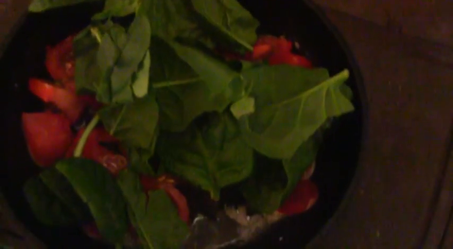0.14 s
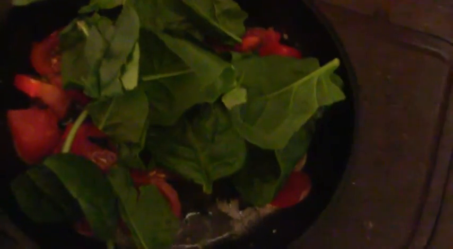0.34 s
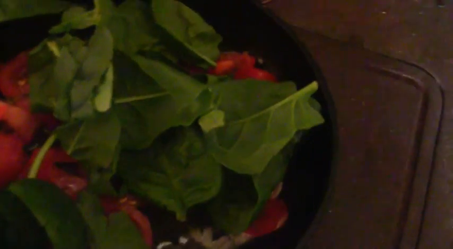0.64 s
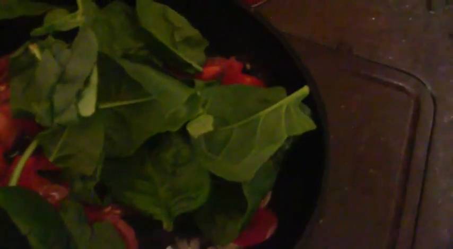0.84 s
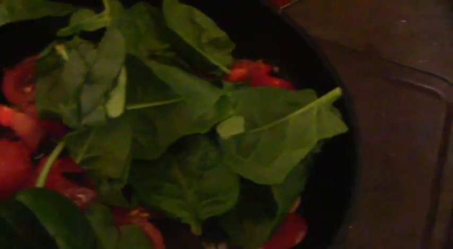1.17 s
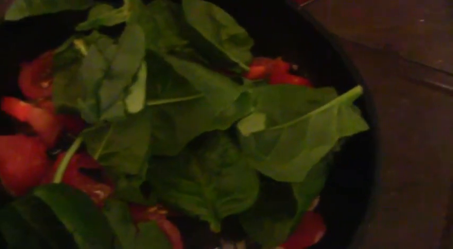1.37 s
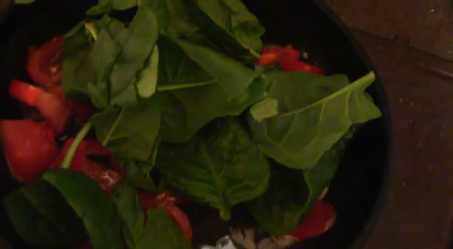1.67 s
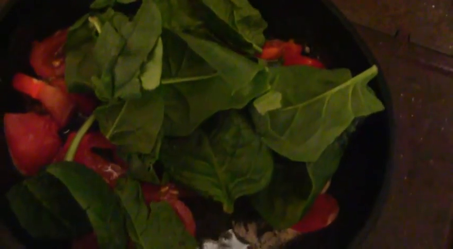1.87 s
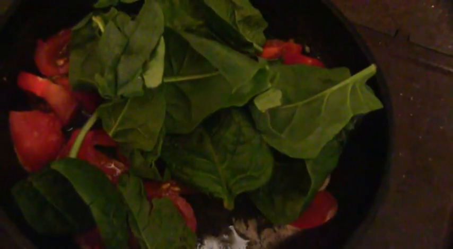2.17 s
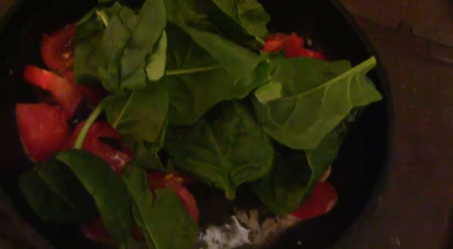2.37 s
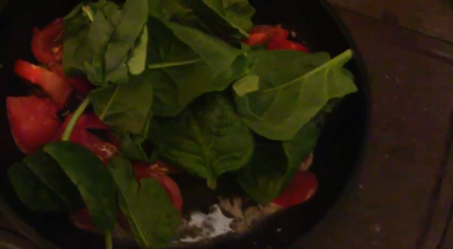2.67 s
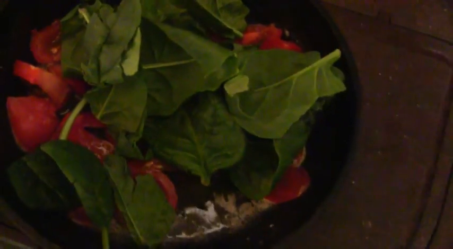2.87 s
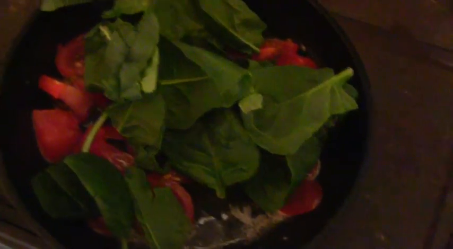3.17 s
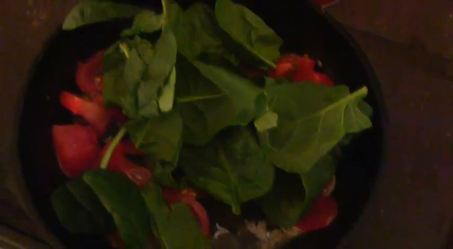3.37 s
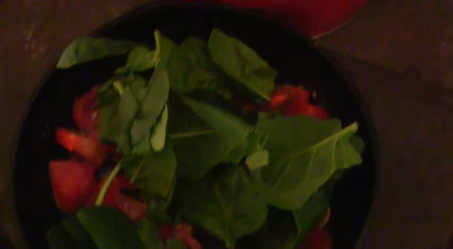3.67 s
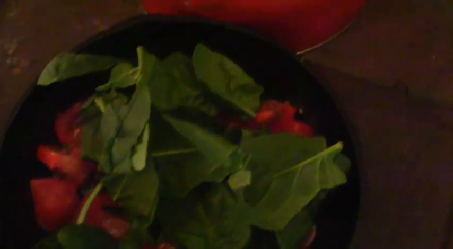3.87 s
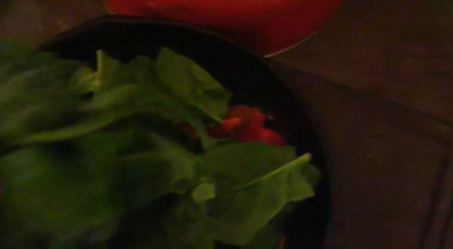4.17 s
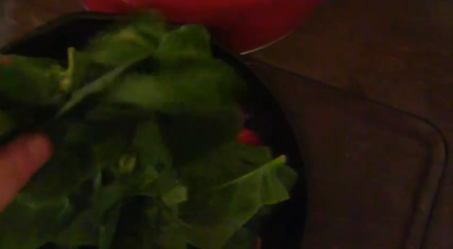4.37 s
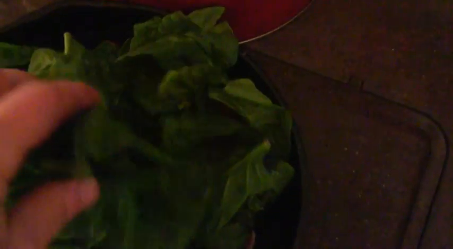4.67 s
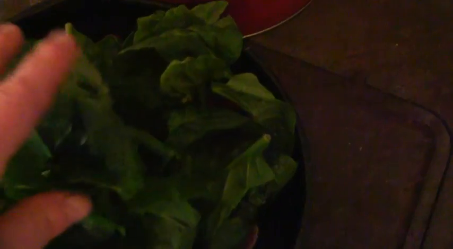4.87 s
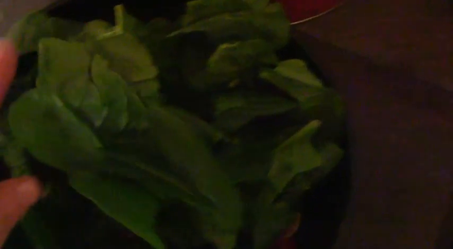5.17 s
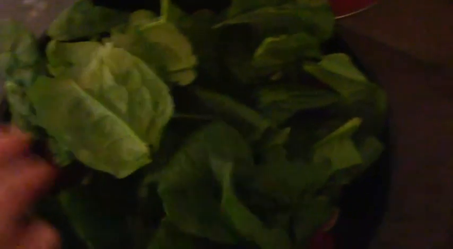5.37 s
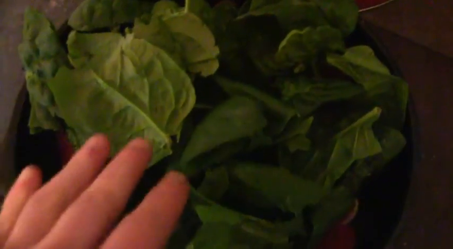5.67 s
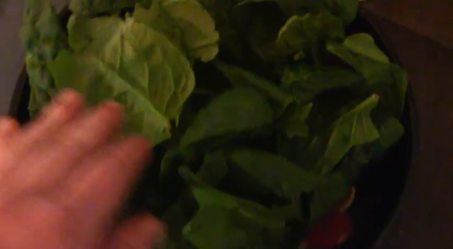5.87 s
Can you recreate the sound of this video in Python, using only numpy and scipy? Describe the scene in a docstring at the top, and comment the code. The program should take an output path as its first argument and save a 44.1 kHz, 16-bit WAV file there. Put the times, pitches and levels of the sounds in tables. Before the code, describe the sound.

Near a close stereo microphone, leafy greens are grabbed and crunch loudly for a few seconds, with dull pats of broad leaves and a sharp click near the middle of the bustle. The noise thins out, small hollow bumps ring a bowl, and soft rustles and tiny ticks mark the pile settling in the pan. Short room reverberation and faint appliance hum surround it.

```python
"""Raw spinach leaves rustle and crinkle close by as a handful is gathered, then more softly as it is piled into a pan:
noise and tiny snaps follow the hand's strokes, with coloured bursts for the largest buckles.
Stems flick free as rough notes, leaves pat the bowl and scrape its rim, something hard clicks once and rebounds,
and hollow knocks ring the bowl's modes. A small kitchen answers with a diffuse tail, over still air and a low hum."""
import sys
import numpy as np
from scipy import signal
from scipy.fft import rfft, irfft, next_fast_len
from scipy.io import wavfile
from scipy.ndimage import uniform_filter1d, map_coordinates

SR = 44100
rng = np.random.default_rng(int(sys.argv[2]) if len(sys.argv) > 2 else 0)


def put_to_file(sound):
    """Save the sound as 16-bit audio at rate SR, in the file named by the first command-line argument."""
    columns = np.atleast_2d(sound).T  # one column per channel
    safe = np.clip(columns, -1, 1)
    whole_steps = np.round(safe * 32767)
    wavfile.write(sys.argv[1], SR, whole_steps.astype(np.int16))


N = 265437


def amp(db):
    """Decibels to amplitude gain."""
    return 10 ** (np.asarray(db) / 20)


def unit(x):
    """Scale to rms 1."""
    return x / np.sqrt(np.mean(x ** 2) + 1e-20)


def along(points, hz):
    """Interpolate (frequency [Hz], value) points on a log-frequency axis."""
    point_hz, values = np.transpose(points)
    return np.interp(np.log(hz + 1), np.log(point_hz + 1), values)


def wobble(rate_hz):
    """Smooth random curve with rate_hz knots a second."""
    knots = rng.standard_normal(int(N * rate_hz / SR) + 4)
    return map_coordinates(knots, [np.arange(N) * rate_hz / SR])


def coloured(x, gain_db):
    """Causal minimum-phase filter from a gain [dB] function of frequency [Hz]."""
    n = x.shape[-1]
    m = 2 * next_fast_len(n)
    gain = np.maximum(amp(gain_db(np.fft.rfftfreq(m, 1 / SR))), 1e-6)
    cepstrum = irfft(np.log(gain))
    # fold the cepstrum onto positive time
    cepstrum[1:m // 2] *= 2
    cepstrum[m // 2 + 1:] = 0
    return irfft(rfft(x, m) * np.exp(rfft(cepstrum)), m)[..., :n]


# stereo width: (frequency [Hz], side gain [dB])
SIDE_WIDTH = [(100, -9.5), (500, -8), (2000, -6), (12000, -6)]


def stereo(mid, side):
    """Mid and side to left and right: nearly alike in the bass, wider in the treble."""
    side = coloured(side, lambda hz: along(SIDE_WIDTH, hz))
    return np.array([mid + side, mid - side])


def add(track, time_s, sound):
    """Mix a sound in at time_s, cut at the track's end."""
    part = track[..., round(time_s * SR):][..., :sound.shape[-1]]
    part += sound[..., :part.shape[-1]]


def ring(hz, t60_s, attack_s):
    """One damped mode: an exponentially decaying sine with a soft attack."""
    t = np.arange(SR // 4) / SR
    return np.sin(2 * np.pi * hz * t) * amp(-60 * t / t60_s) * (1 - np.exp(-t / attack_s))


def rough_phase(hz, t, blur):
    """Mid and side phase of a tone whose pitch is blurred by a random walk."""
    walk = np.cumsum(rng.standard_normal((2, len(t))), axis=1)
    return 2 * np.pi * hz * t + blur * np.sqrt(hz / SR) * walk


# still air spectrum: (frequency [Hz], relative level [dB per Hz])
AIR_SPECTRUM = [(20, -38), (40, -17), (60, -10.5), (95, -8), (200, -4.5), (280, -7), (370, -13.5),
                (520, -12.5), (1500, -23), (4000, -29), (10000, -33.5), (16000, -40.5)]
# appliance hum tones: (frequency [Hz], central rms level [dB])
HUM_TONES = [(76, -62), (120, -64)]


def background(air_db=-52.0, waver_db=3, drift_rad=1.83):
    """Still kitchen air as shaped noise; appliance hum as sines wavering in level and phase."""
    t = np.arange(N) / SR
    air = unit(coloured(rng.standard_normal((2, N)), lambda hz: along(AIR_SPECTRUM, hz)))
    hum = np.zeros(N)
    for hz, db in HUM_TONES:
        level = amp(db + waver_db * wobble(8))
        hum += level * np.sin(2 * np.pi * hz * t + drift_rad * wobble(9))
    return amp(air_db) * stereo(*air) + np.sqrt(2) * hum


# loudest leaves and stems buckling:
# (time [s], relative level [dB], treble share [dB], fold resonance [Hz])
BUCKLES = [(0.3035, -33, -16, 2740), (0.4425, -32.5, -22, 2540), (0.4867, -27, -15, 3130),
           (0.608, -31.5, -11, 1340), (0.699, -21, -9, 1390), (0.7257, -20.5, -8, 7640),
           (0.767, -28.5, -2, 6860), (0.8305, -21, -9, 8500), (0.877, -23, -2, 3870),
           (0.902, -16.5, -6, 5170), (0.9104, -15, -7, 4440), (0.921, -19.5, -10, 2770),
           (0.9708, -17.5, -21, 2200), (0.9803, -21, -8, 1400), (1.0076, -19, 0, 6470),
           (1.0358, -20, 2, 4650), (1.075, -23, -8, 3400), (1.1324, -17, -10.5, 8450),
           (1.2323, -18, -8, 3460), (1.2466, -18, -11, 7000), (1.263, -23, 8, 7140),
           (1.2992, -17, -14, 7600), (1.352, -21, -9, 1850), (1.368, -22, -8, 2980),
           (1.404, -19.5, -10, 2530), (1.4227, -16.5, 2, 4580), (1.453, -23, -10, 2260),
           (1.49, -20, -6, 3030), (1.516, -19.5, -16, 3430), (1.5868, -15, -11.5, 2740),
           (1.608, -20.5, -3, 7000), (1.622, -20, -4, 2730), (1.677, -25, -14, 1350),
           (1.9792, -25, -15, 3160), (2.122, -25, -13, 3180), (2.223, -22, -18, 1290),
           (2.322, -26.5, -5, 4410), (2.359, -20, -23, 1780), (2.4851, -15.5, -12, 3500),
           (2.492, -17.5, -11, 3000), (2.572, -25, -11, 3830), (2.598, -15, -11.5, 2970),
           (2.641, -24, 4, 5000), (2.6803, -14.5, -12, 2900), (2.7047, -19.5, -5, 2920),
           (2.722, -19.5, -7, 3200), (2.8013, -21, -10, 4800), (2.8765, -33, 0, 4900),
           (2.8963, -30, -8, 3700), (2.9592, -25.5, -19, 1540), (2.9916, -28, -6, 4700),
           (3.0233, -33, 1, 3670), (3.0915, -23, -10, 2430), (3.1853, -27, -13, 3600),
           (3.268, -25.5, -1, 4000), (3.28, -24.5, -15, 7970), (3.4251, -23.5, -5, 1660),
           (3.477, -20.5, -1, 7550), (3.563, -29, -6, 1640), (4.1218, -29, -18, 1170),
           (4.485, -29.5, -20, 2700), (4.6455, -28.5, -14, 3760)]
# near-leaf spectrum: (frequency [Hz], relative level [dB])
NEAR_LEAF_SPECTRUM = [(40, -54), (350, -7), (600, 0), (1100, 1), (1600, -0.5), (2300, -2), (3100, -1.5),
                      (5000, -3.5), (8000, -6), (11000, -10.5), (14500, -11), (16000, -23)]
BUCKLE_BUILD_DB_PER_S, BUCKLE_PEAK_S, BUCKLE_T60_S = 7000, 0.0011, .062
FOLD_DB, RAGGED_DB = 8.5, 3.2  # fold resonance boost; scale of the random level


def crinkles(level_db=-12, hold_s=0.0017, colour=0.46, octaves=0.13, low_db=-2, dull_body=0.18,
             usual_treble_db=-12, top_colour=0.9, top_db=-2):
    """A buckling leaf's ragged fractures build, hold and die; the fold colours them, dull ones have more body."""
    lead = SR // 100
    out, t = np.zeros((2, N + lead)), np.arange(-lead, SR // 8) / SR
    age = t - BUCKLE_PEAK_S
    build_db = BUCKLE_BUILD_DB_PER_S * np.minimum(age, 0)
    shape = amp(build_db - 60 * np.maximum(age - hold_s, 0) / BUCKLE_T60_S)
    for time_s, db, treble_db, fold_hz in BUCKLES:
        knots = rng.standard_normal(len(t))
        ragged = amp(RAGGED_DB * map_coordinates(knots, [(t - t[0]) * 900], order=1))
        bright_db = treble_db - usual_treble_db
        tilt = [(1800, low_db - dull_body * bright_db), (4000, 0.039),
                (8000, colour * bright_db), (13000, top_colour * bright_db + top_db)]

        def spectrum_db(hz):
            fold_db = FOLD_DB / (1 + (np.log2((hz + 1) / fold_hz) / octaves) ** 2)
            return along(NEAR_LEAF_SPECTRUM, hz) + along(tilt, hz) + fold_db

        burst = coloured(rng.standard_normal((2, len(t))) * ragged * shape, spectrum_db)
        early_rms = np.sqrt(np.mean(burst[:, lead:lead + SR // 125] ** 2))  # first 8 ms
        add(out, time_s, amp(db + level_db) * burst / early_rms)
    return stereo(*out[:, lead:])


# hand strokes through the leaves:
# (start [s], length [s], crisp rustle level [dB], soft flapping relative to it [dB])
HAND_STROKES = [(0.382, 0.14, -43, -3.5), (0.568, 0.54, -42, -3), (0.822, 0.16, -36, -17),
                (1.151, 0.63, -36.5, -7), (1.72, 0.22, -40, -7.5), (1.937, 0.32, -43.5, -6.5),
                (2.185, 0.04, -33, -14), (2.284, 0.38, -39, -8), (2.6, 0.18, -36, -7),
                (2.923, 0.23, -47.5, -5), (3.407, 0.039, -40.5, -4), (3.716, 0.5, -56, -8),
                (4.082, 0.31, -51, 0.5), (4.419, 0.25, -45, -20), (4.723, 0.073, -44.5, -20),
                (4.918, 0.074, -49, -15), (5.222, 0.46, -52.5, -19), (5.815, 0.032, -56, 3)]
STROKE_ATTACK_S, STROKE_RELEASE_DB_PER_S = 0.031, 108


def strokes():
    """Gains of rustle and flapping: each stroke builds, holds and dies as the leaves settle."""
    t = np.arange(N) / SR
    crisp, soft = np.zeros((2, N))
    for start_s, length_s, db, soft_db in HAND_STROKES:
        rise = np.clip((t - start_s) / STROKE_ATTACK_S, 0, 1)
        release_db = STROKE_RELEASE_DB_PER_S * np.maximum(t - start_s - length_s, 0)
        power = (rise * amp(db - release_db)) ** 2
        crisp += power
        soft += power * amp(soft_db) ** 2
    return np.sqrt(crisp), np.sqrt(soft)


def crackle(rate_hz, spread_db, t60_s):
    """Mid and side of tiny fractures: random moments, few large and many small, each a brief noise burst."""
    sizes = amp(spread_db * np.minimum(rng.exponential(size=N), 3))
    fractures = (rng.random(N) < rate_hz / SR) * sizes
    decay = amp(-60 * np.arange(SR // 10) / SR / t60_s)
    power = np.abs(signal.fftconvolve(fractures ** 2, decay ** 2)[:N])
    # the hand's steady pressure evens the fractures out over a stroke
    power = power / (np.abs(uniform_filter1d(power, size=4000)) + 1e-9)
    return np.sqrt(power) * rng.standard_normal((2, N))


def snaps(rate_hz, spread_db, t60_s, blur, low_hz=900, high_hz=13000):
    """Mid and side of small veins giving way: each a quickly dying note of random, blurred pitch."""
    out, t = np.zeros((2, N)), np.arange(SR // 25) / SR
    for when, size, height in rng.random((int(rate_hz * N / SR), 3)):
        hz = low_hz * (high_hz / low_hz) ** height
        db = spread_db * min(-np.log(1 - size), 3)
        note = np.sin(rough_phase(hz, t, blur))
        add(out, when * N / SR, np.sqrt(hz) * amp(db - 60 * t / t60_s) * note)
    # the hand's steady pressure evens them out over a stroke
    local_power = np.abs(uniform_filter1d(np.mean(out ** 2, axis=0), size=6000))
    return out / np.sqrt(local_power + 1e-9)


# spectrum of leaves in the pan: (frequency [Hz], relative level [dB per Hz])
PILED_LEAF_SPECTRUM = [(350, -23), (700, 6), (1300, 1.5), (2300, 4.5), (3800, 1.5), (7000, -3.5),
                       (12000, -12.5), (16000, -24)]
# spectrum of broad blades flapping: (frequency [Hz], relative level [dB per Hz])
FLAP_SPECTRUM = [(65, -65), (110, 1), (189, 5), (327, -3), (455, 1.5), (560, 0), (679, -6), (846, -7),
                 (1200, -16), (1560, -45), (2640, -120)]
PAN_S, PAN_FADE_S = 3.9, 0.091  # when the handful moves over the pan, and for how long
SNAP_T60_S, FLUTTER_DB = .04, 1.2


def rustle(crisp, soft, near_db=-1, pan_db=-2, pan_flap_db=-4, near_slide_db=-3, pan_slide_db=-1):
    """Leaves slide and snap while broad blades flap lower down; in the pan they sound duller."""
    in_pan = np.clip((np.arange(N) / SR - PAN_S) / PAN_FADE_S, 0, 1)
    slide = crackle(rate_hz=900, spread_db=4.5, t60_s=.01)
    tight_snaps = snaps(rate_hz=420, spread_db=2.0, t60_s=SNAP_T60_S, blur=1.194)
    loose_snaps = snaps(rate_hz=260, spread_db=0, t60_s=SNAP_T60_S, blur=0.98, high_hz=11200)
    tight = amp(near_slide_db) * slide + tight_snaps
    loose = amp(pan_slide_db) * slide + loose_snaps
    near = amp(near_db) * unit(coloured(tight, lambda hz: along(NEAR_LEAF_SPECTRUM, hz)))
    piled = amp(pan_db) * unit(coloured(loose, lambda hz: along(PILED_LEAF_SPECTRUM, hz)))
    flutter = amp(FLUTTER_DB * wobble(35))
    leaves = ((1 - in_pan) * near + in_pan * piled) * crisp * flutter
    flap_snaps = snaps(rate_hz=170, spread_db=1, t60_s=0.059, blur=0.8, low_hz=419.5, high_hz=1407)
    flaps = rng.standard_normal((2, N)) + flap_snaps
    blades = unit(coloured(flaps, lambda hz: along(FLAP_SPECTRUM, hz)))
    return stereo(*(leaves + blades * soft * amp(in_pan * pan_flap_db)))


# leaves flopping against the bowl: (time [s], relative level [dB], main pitch [Hz])
LEAF_PATS = [(0.495, -20, 560), (0.6986, -16.5, 1097), (0.801, -26, 526), (0.875, -23.5, 476),
             (0.907, -16.5, 746), (1.211, -18.5, 450), (1.232, -17, 560), (1.284, -21, 1480),
             (1.3, -21, 754), (1.586, -17.5, 570), (1.678, -22, 796), (2.05, -22.5, 820),
             (2.528, -16.5, 417), (2.572, -20, 476), (2.705, -18, 530), (2.815, -17, 490),
             (2.838, -21.5, 460), (5.47, -33.5, 534)]


def pats(level_db=-1, t60_s=0.028, upper_db=-8, lower_db=-12):
    """A soft leaf lands with a short, dull note of three damped modes."""
    out = np.zeros(N)
    for time_s, db, hz in LEAF_PATS:
        upper_hz = hz * rng.uniform(1.0, 1.88)
        lower_hz = hz * rng.uniform(0.69, 0.89)
        note = ring(hz, t60_s, 0.0028)
        note += amp(upper_db) * ring(upper_hz, t60_s, 0.0033)
        note += amp(lower_db) * ring(lower_hz, t60_s, 0.00085)
        add(out, time_s, amp(db + level_db) * note)
    return out


# hard contact, then its rebound: (time [s], relative level [dB])
CLICK_HITS = [(1.7644, -6), (1.7674, -5)]
# modes of the hard contact: (frequency [Hz], relative level [dB])
CLICK_MODES = [(150, -16), (250, -17), (490, -17), (805, -16), (1274, -9), (1555, -3), (2080, -4),
               (2400, -11), (3820, -5), (4180, -8), (4900, -12), (7950, -17)]
# crack spectrum: (frequency [Hz], relative level [dB per Hz])
CRACK_SPECTRUM = [(71, -103), (120, 1.5), (1730, -4), (2070, 2), (3570, -5), (4120, -3.5), (5040, -1.5),
                  (6040, -14.5), (7700, -10.5), (11100, -12), (13600, -28), (15000, -51)]
CLICK_RING_T60_S, CRACK_T60_S = .014, .009  # ring: value at 2 kHz


def click(crack_db=-1.0, modes_db=-1, linger_db=-23, linger_t60_s=0.11, scatter_db=-13,
          scatter_t60_s=0.087, scatter_rise_s=0.0015):
    """A hard contact rings modes that linger; it and its rebound crack, scattering off pan and worktop."""
    out, t = np.zeros((2, N)), np.arange(SR // 4) / SR
    modes = np.zeros(len(t))
    for k, (hz, db) in enumerate(CLICK_MODES):
        short = ring(hz, CLICK_RING_T60_S * np.sqrt(2000 / hz), .0001)
        linger = amp(linger_db) * ring(hz, linger_t60_s, .002)
        modes += (-1) ** k * amp(db) * (short + linger)
    contact_s, contact_db = CLICK_HITS[0]
    add(out, contact_s, amp(contact_db + modes_db) * modes)
    crack = amp(crack_db - 60 * t / CRACK_T60_S)
    scatter = amp(scatter_db - 60 * t / scatter_t60_s) * (1 - np.exp(-t / scatter_rise_s))
    for time_s, db in CLICK_HITS:
        noise = unit(coloured(rng.standard_normal((2, len(t))), lambda hz: along(CRACK_SPECTRUM, hz)))
        add(out, time_s, amp(db) * stereo(*noise) * (crack + scatter))
    return out


# leaves dragging on the bowl's rim: (time [s], level [dB], length before fading [s])
RIM_SCRAPES = [(2.207, -37.5, 0.037), (3.435, -40.5, 0.023), (3.567, -50, 0.0099), (5.962, -45, 0.041)]
# rim resonances: (centre [Hz], width [Hz], relative level [dB])
RIM_MODES = [(1370, 320, 5), (2250, 220, -3.5), (4450, 220, -5.5)]


def scrapes(fade_t60_s=0.05):
    """Sticking and slipping, as noise, excites the rim's broad resonances."""
    out, t = np.zeros((2, N)), np.arange(SR // 5) / SR

    def rim_db(hz):
        power = sum(amp(db) ** 2 / (1 + (2 * (hz - centre_hz) / width_hz) ** 2)
                    for centre_hz, width_hz, db in RIM_MODES)
        return 10 * np.log10(power)

    for time_s, db, length_s in RIM_SCRAPES:
        slips = unit(coloured(rng.standard_normal((2, len(t))), rim_db))
        fade_db = 60 * np.maximum(t - length_s, 0) / fade_t60_s
        add(out, time_s, slips * amp(db - fade_db))
    return stereo(*out)


# stiff stems flicking free: (time [s], level [dB], pitch [Hz])
STEM_FLICKS = [(2.413, -23.5, 2350), (3.1485, -31.5, 4820), (4.5084, -35, 2200), (4.516, -31, 2220),
               (4.663, -38, 3730), (4.82, -39, 2020), (4.9152, -35, 1750), (5.276, -41.5, 2660),
               (5.408, -33, 2064), (5.6053, -40, 2180), (5.628, -40, 3350), (5.6634, -39.5, 2800),
               (5.685, -39, 3700)]
# stem bending modes: (ratio to pitch [1], relative level [dB])
BENDING_MODES = [(0.54, -7.5), (0.999, -0.5), (1.27, -8.5)]


def stems(t60_s=0.033, blur=0.69, tick_db=-9, tick_t60_s=0.027):
    """A stiff stem flicks free: a dry noise tick and a short, slightly rough note of bending modes."""
    out, t = np.zeros((2, N)), np.arange(SR // 10) / SR
    for time_s, db, hz in STEM_FLICKS:
        phase = rough_phase(hz, t, blur)
        modes = sum(amp(mode_db) * np.sin(ratio * phase) for ratio, mode_db in BENDING_MODES)
        note = modes * amp(-60 * t / t60_s)
        noise = rng.standard_normal((2, len(t)))
        tick = unit(coloured(noise, lambda f: along(PILED_LEAF_SPECTRUM, f)))
        tick = tick * amp(tick_db - 60 * t / tick_t60_s)
        add(out, time_s, amp(db) * (note + tick))
    return stereo(*out)


# hollow knocks: (time [s], relative level [dB], pitch the contact favours [Hz])
BOWL_KNOCKS = [(3.755, -31, 534), (3.832, -36, 1050), (3.874, -31, 784), (3.88, -30.5, 1070),
               (3.912, -37, 1050), (4.325, -37.5, 620), (4.338, -44, 950), (4.415, -38, 880),
               (4.733, -37, 885), (4.775, -40, 794), (5.065, -35.5, 880), (5.16, -47, 824)]
# nominal bowl modes: frequency [Hz]
BOWL_MODES = [550, 808, 930, 1077]
BOWL_T60_S = .04


def knocks(level_db=1, scatter=0.055, thud_db=-6, thud_t60_s=0.081, falloff_db_per_octave=14):
    """Each nudge is a dull thud ringing the bowl's modes, weaker away from the contact's pitch."""
    out, t = np.zeros(N), np.arange(SR // 4) / SR
    dull = [(150, -11.5), (450, -1.5), (1100, -2.5), (1400, -38), (4000, -35.0)]  # (Hz, dB)
    for time_s, db, contact_hz in BOWL_KNOCKS:
        thud = unit(coloured(rng.standard_normal(len(t)), lambda hz: along(dull, hz)))
        add(out, time_s, thud * amp(db + thud_db - 60 * t / thud_t60_s))
        for hz in BOWL_MODES:
            octaves_off = abs(np.log2(hz / contact_hz))
            gain = amp(db + level_db - falloff_db_per_octave * octaves_off)
            mode_hz = hz * (1 + scatter * rng.normal())
            add(out, time_s, gain * ring(mode_hz, BOWL_T60_S, 0.0022))
    return out


# kitchen reverberation: (frequency [Hz], t60 [s])
KITCHEN_T60 = [(150, 0.54), (1000, 0.33), (4000, 0.35), (14000, 0.092)]


def kitchen(x, side_db=3):
    """The walls' answer: convolution with a diffuse noise tail whose decay time varies with frequency."""
    hz, t, bins = signal.stft(rng.standard_normal((2, SR // 2)), SR, nperseg=256)
    decay = amp(-60 * t / along(KITCHEN_T60, hz)[:, None])
    tail = signal.istft(bins * decay, SR, nperseg=256)[1]
    tail = tail * (1 - np.exp(-np.arange(tail.shape[1]) / SR / 0.003))  # 3 ms onset
    mid, side = tail / np.linalg.norm(tail[0])
    response = stereo(mid, amp(side_db) * side)
    return signal.fftconvolve(x.mean(axis=0)[None], response, axes=1)[:, :N]


def far_walls(x, level_db=-14, delay_s=0.028):
    """The far side of the kitchen returns a sharp sound a moment later, diffused."""
    out = np.zeros((2, N))
    add(out, delay_s, amp(level_db) * kitchen(x))
    return out


def scene(leaf_room_db=-12, click_room_db=-12, bowl_room_db=-6):
    """Leaves, click and bowl in the kitchen, over its air and hum."""
    crisp, soft = strokes()
    leaves = crinkles() + rustle(crisp, soft) + pats() + scrapes() + stems()
    hit, bowl = click(), knocks()
    walls = kitchen(amp(leaf_room_db) * leaves)
    walls += kitchen(amp(click_room_db) * hit + amp(bowl_room_db) * bowl)
    walls += far_walls(hit)
    return background() + leaves + hit + bowl + walls


MIC_LOW_HZ, TOP_HZ = 42, 15950  # bass roll-off; band limit
CEILING = .9  # full scale = 1


def record(dry):
    """The recorder thins the deepest bass, rounds off peaks near full scale and cuts above its band limit."""
    thinned = coloured(dry, lambda hz: -10 * np.log10(1 + (MIC_LOW_HZ / (hz + 1)) ** 4))
    rounded = thinned / (1 + np.abs(thinned / CEILING) ** 6) ** (1 / 6)
    m = next_fast_len(N + SR // 2)
    in_band = np.fft.rfftfreq(m, 1 / SR) < TOP_HZ
    return irfft(rfft(rounded, m) * in_band, m)[:, :N]


dry = scene()
out = record(dry)
put_to_file(out)
```